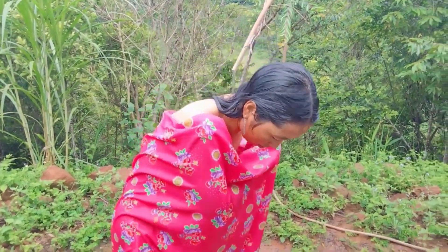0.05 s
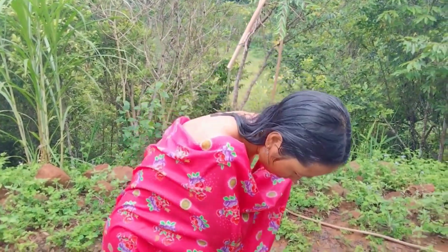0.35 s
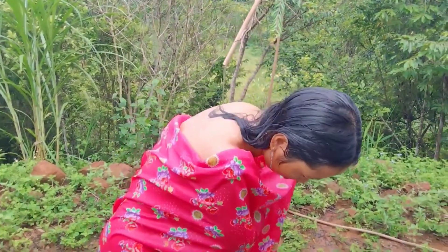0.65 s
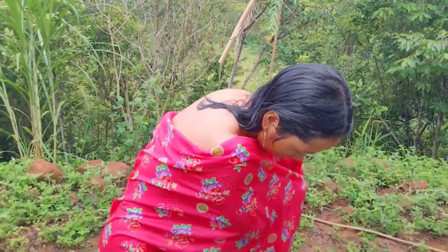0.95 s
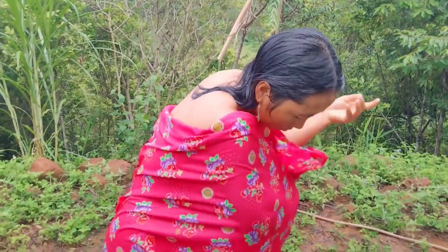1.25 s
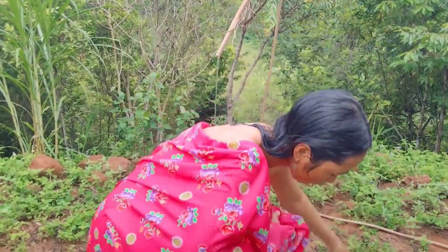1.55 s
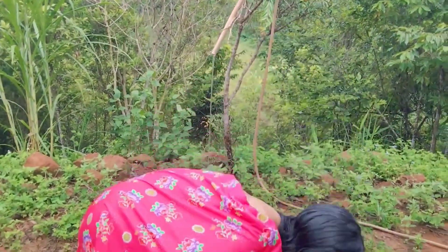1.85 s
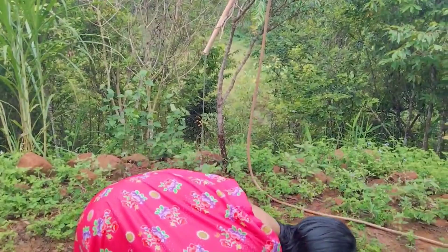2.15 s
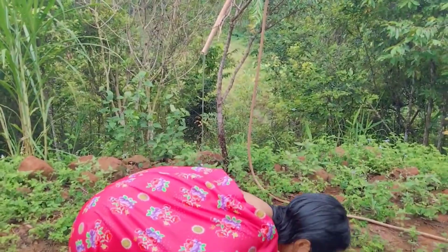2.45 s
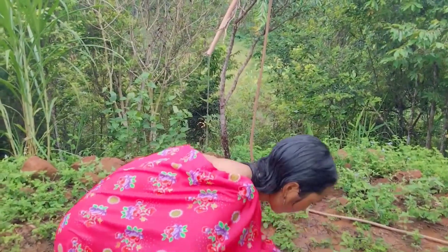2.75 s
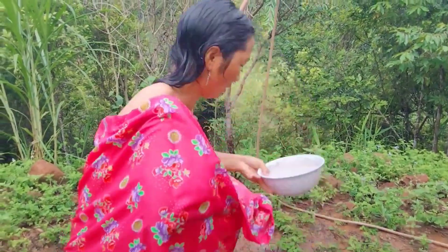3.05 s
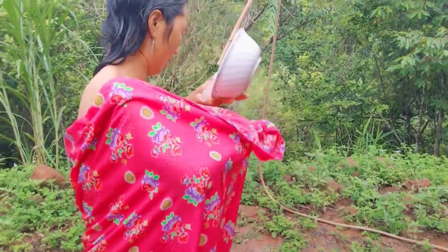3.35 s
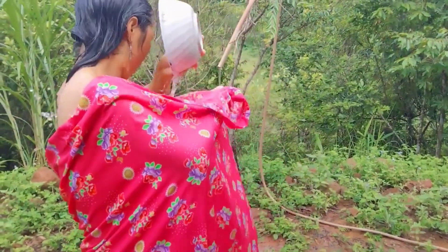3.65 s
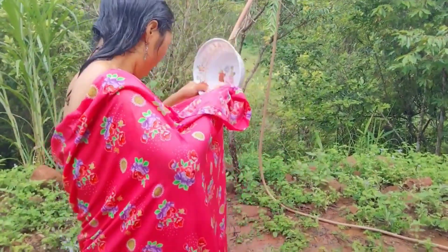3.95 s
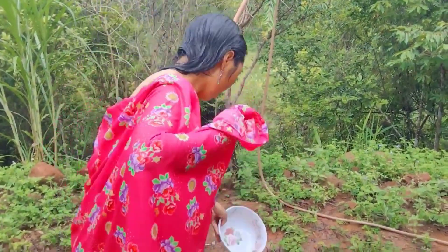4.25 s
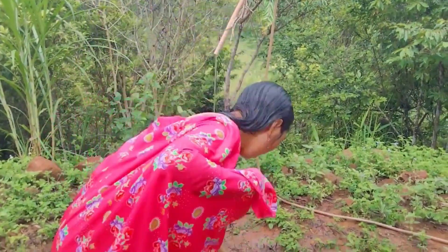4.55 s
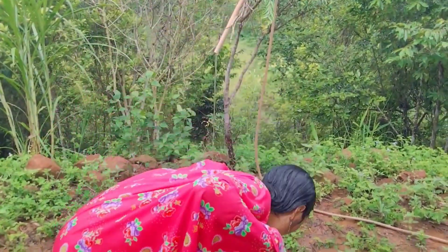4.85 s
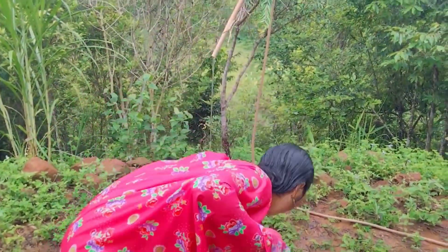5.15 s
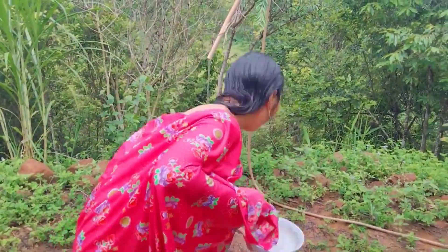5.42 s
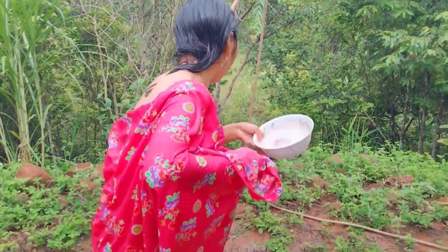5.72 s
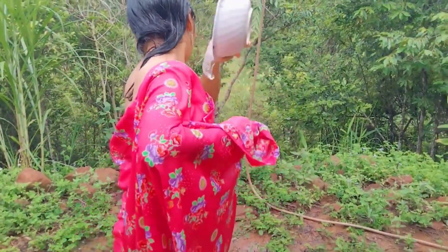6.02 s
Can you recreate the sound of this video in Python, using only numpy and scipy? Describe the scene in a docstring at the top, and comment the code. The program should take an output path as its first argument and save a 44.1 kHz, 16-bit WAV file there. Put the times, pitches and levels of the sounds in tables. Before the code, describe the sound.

Someone bathes in a garden: soft drips, a bowl gurgling as it fills, and two louder splashing pours.

```python
"""A bath in a garden with a plastic bowl. Over faint open air, wet cloth drips and water swishes on it.
From 1.7 s the bowl is dipped and gulps full: large bubbles ring and glide upward, and the bowl gives one
long hollow ring. At 3.5 s it is emptied over the body; water slaps and patters on the ground as clouds of
tiny bubbles and noise. From 4.5 s the bowl is filled again, and just before the end it is tipped once more.
Throughout, the right microphone port rings in the treble."""
import sys
import numpy as np
from scipy import signal
from scipy.fft import rfft, irfft, next_fast_len
from scipy.io import wavfile
from scipy.ndimage import map_coordinates

SR = 44100
rng = np.random.default_rng(int(sys.argv[2]) if len(sys.argv) > 2 else 0)


def log_audio(samples):
    """Write samples as a 16-bit WAV file to the path given in sys.argv[1]."""
    # one column per channel
    frames = np.atleast_2d(samples).T
    # limit to full scale, then quantise
    limited = np.clip(frames, -1, 1)
    pcm = np.round(limited * 32767).astype(np.int16)
    wavfile.write(sys.argv[1], SR, pcm)


N = 272538

# open air: time_s, level_db, left_minus_right_db
AIR_LEVELS = [(0.0, -59, -7.5), (1.2, -58.5, -10), (2.1, -57, -4), (2.9, -55.5, -5.5), (3.7, -56, -1.5),
              (5.1, -55, -3), (5.7, -55.5, -5.5), (6.18, -54, -4)]
# rumble of air and water: freq_hz, gain_db
RUMBLE_SPECTRUM = [(20, -19), (35, -7), (65, -15.5), (100, -2.5), (135, -2.5), (200, -2), (350, -4.5),
                   (600, -5.5), (1100, -14.5), (2000, -21), (6000, -32), (10000, -25.5)]
# its left-right likeness: freq_hz, correlation
RUMBLE_CORRELATION = [(30, 0.37), (100, 1), (500, 0.46), (2000, 0.043)]
# where the water lands: time_s, left_minus_right_db
WATER_PAN = [(0.0, -4), (0.6, -2), (2.1, -1.5), (3.2, -1.5), (3.4, 2), (3.85, 5), (3.98, -1), (5.15, 0.5),
             (5.5, -1.5)]
# fine, medium and coarse water: freq_hz, gain_db
SPRAY_SPECTRUM = [(200, -68), (2000, -18.5), (4500, -5.5), (6500, -5.5), (9000, -2), (11500, -1),
                  (13500, 0), (15500, 2)]
PATTER_SPECTRUM = [(100, -60), (800, -22), (1800, -7.5), (2700, -1), (4000, -2), (6000, -7.5),
                   (9000, -21.5), (15000, -5)]
SLOSH_SPECTRUM = [(40, -55), (150, -38), (300, -3), (430, -4), (600, 1), (850, 2), (1350, -0.5),
                  (2000, -2.5), (3200, -10.5), (7000, -22)]
# dripping cloth: spray_db, patter_db, slosh_db
CLOTH_TRICKLE_DB = [-63, -76.5, -70]
# loose masses landing: start_s, spray_db, patter_db, slosh_db, rise_s, t60_s
WATER_SLAPS = [(0.078, -47, -53.5, -70, .002, 0.11), (0.361, -48.5, -58, -77, .002, 0.092),
               (0.672, -42.5, -49, -54, 0.00091, 0.56), (0.706, -38, -43, -45, 0.0027, 0.09),
               (0.861, -41, -54.5, -59.5, 0.0024, 0.35), (1.338, -44, -64, -65, .008, 0.44),
               (1.736, -43.5, -49.5, -55, .002, 0.24), (1.957, -61, -55, -33.5, .001, 0.36),
               (2.324, -42, -44.5, -48, 0.0035, 0.37), (2.5, -50, -51.5, -53, .002, 0.23),
               (3.81, -41, -35, -46, 0.0017, 0.1), (3.833, -29, -54, -40, 0.0027, 0.073),
               (3.886, -48, -41.5, -62, 0.0017, 0.12), (4.072, -51, -41.5, -63, .002, 0.23),
               (4.104, -42, -34, -30, .002, 0.19), (4.12, -23, -33, -31.5, 0.019, 0.065),
               (4.447, -40.5, -41.5, -46, .002, 0.2), (4.518, -45, -43, -31.5, .007, 0.024),
               (4.576, -56, -47, -45.5, .003, 0.24), (4.761, -54, -64, -42, 0.0035, 0.28),
               (4.965, -47, -42, -56, 0.0032, 0.22), (5.274, -38, -42, -38.5, 0.0018, 0.18),
               (6.14, -36.5, -50, -63, 0.0025, .25)]
# single drops close by: start_s, relative_db
NEAR_DROPS = [(0.0818, -26), (0.2089, -33.5), (0.4286, -32), (1.3184, -30.5), (1.42, -35), (1.7, -21.5),
              (1.73, -26), (1.8265, -21), (1.922, -23.5), (2.0793, -24), (2.5004, -26), (2.5247, -34),
              (2.739, -26.5), (2.7945, -27), (2.87, -31), (2.8938, -26.5), (2.9396, -28), (3.04, -27.5),
              (3.0672, -24.5), (3.444, -12), (3.458, -10), (3.587, -14), (3.6018, -7.5), (3.6958, -9.5),
              (3.955, -20), (3.9809, -16.5), (4.198, -23), (4.214, -14.5), (4.2989, -12.5), (4.362, -20),
              (4.4194, -15), (4.5227, -20), (4.559, -22), (4.5748, -17), (4.6547, -13), (4.803, -15.5),
              (4.8771, -12), (4.9648, -14.5), (5.0775, -20), (5.1061, -15), (5.1833, -17), (5.2638, -18),
              (5.3522, -29), (5.4475, -29), (5.5295, -25), (5.5762, -20.5), (5.7169, -26), (5.987, -20.5)]
# their colour: freq_hz, gain_db
DROP_SPECTRUM = [(80, -45), (500, -31), (2500, -23), (4500, -10), (7000, -9.5), (9500, -5.5), (14000, -3.5)]
# water over cloth: peak_s, spray_db, slosh_db, width_s
CLOTH_SWISHES = [(0.104, -55.5, -67, 0.12), (0.433, -55.5, -79, 0.066), (0.588, -49.5, -56.5, 0.11),
                 (1.245, -56, -67, 0.11), (1.45, -58, -72, 0.094), (1.695, -53.5, -64, 0.12),
                 (2.46, -55, -63, 0.12), (2.742, -49, -54, 0.078), (2.923, -53, -64, 0.11),
                 (3.08, -51.5, -61.5, 0.1), (3.234, -44.5, -50, 0.11), (3.42, -39.5, -51.5, 0.16),
                 (4.02, -41.5, -80, 0.041), (5.497, -47, -64, .045), (5.835, -47, -56.5, 0.068),
                 (5.92, -43.5, -50, 0.078), (6.075, -47.5, -62.5, 0.18)]
# air bubbles, and one long hollow ring of the bowl (at 2.445 s):
# start_s, pitch_hz, relative_db, glide_oct_per_s, t60_s
BUBBLE_AND_BOWL_RINGS = [(0.155, 1330, -51.5, 5, .035), (0.223, 1110, -50, 4, 0.029),
                         (0.362, 4300, -45, 3, .018), (0.706, 1390, -35, 4.5, 0.021),
                         (1.385, 336, -47.5, 1, .12), (1.687, 1240, -32.5, 140, 0.033),
                         (1.738, 2710, -37, 5, 0.02), (1.823, 1100, -39, 6.8, .05),
                         (1.845, 1410, -41, 12, .07), (1.858, 2040, -42, 4, .05),
                         (2.016, 1210, -28, 2, 0.04), (2.039, 1062, -27, 0.82, 0.053),
                         (2.198, 960, -50, 16, .16), (2.27, 925, -38.5, 18, .14), (2.33, 2800, -35, 5, .03),
                         (2.346, 659, -32, 0.46, .1), (2.371, 626, -40.5, 1.4, 0.19),
                         (2.445, 623, -51, 0.64, .5), (2.908, 2950, -46, 3, .025),
                         (3.461, 2650, -22, 2, .02), (3.5, 513, -35, 2, 0.1), (3.525, 770, -36, 2, .054),
                         (4.135, 1350, -22.5, 2, 0.033), (4.466, 513, -35.5, 1.7, .085),
                         (4.516, 1890, -29, 1.4, 0.02), (4.522, 525, -27, 2.9, 0.12),
                         (4.59, 1530, -39.5, 2.5, .034), (4.605, 1180, -36.5, 10, 0.034),
                         (4.805, 970, -33.5, 10.7, 0.073), (4.846, 1056, -33, 5, 0.057),
                         (4.898, 660, -33.5, 2, 0.052), (5.105, 411, -32, .8, 0.071),
                         (5.147, 596, -37, 1.3, 0.11), (5.165, 786, -40, 4.1, .09),
                         (5.326, 1532, -44, 3, .11), (5.89, 1900, -43, 4, .04)]
# bowl scooping: peak_s, spray_db, patter_db, slosh_db, width_s
BOWL_STROKES = [(1.848, -51, -52.5, -46, 0.055), (1.953, -45.5, -52, -51, 0.028),
                (2.084, -48, -56, -44, .085), (2.255, -51, -57.5, -54, 0.082),
                (4.67, -44, -51.5, -51, 0.084), (4.873, -40.5, -42.5, -43, .1),
                (5.002, -42.5, -51, -52, .06), (5.073, -42, -43.5, -40, 0.062),
                (5.17, -42.5, -46.5, -41.5, 0.048), (5.23, -58, -66, -48, .045),
                (5.346, -47, -47.5, -56.5, 0.081)]
# first mass of a bowlful landing: start_s, spray_db, patter_db, slosh_db
BOWL_POURS = [(3.457, -22.5, -26, -37), (6.159, -23, -31.5, -40.5)]
# flow after the landing: spray, patter, slosh
GUSH_DB, GUSH_SAG_DB_PER_S = [-29, -40, -32.5], [11.5, 13, 48.5]
CLOTH_RUNOFF_DB = [-38, -55, -54]
# microphone ports: freq_hz, gain_db
LEFT_PORT_RESPONSE = [(500, -1.5), (3000, 1), (6000, -3.5), (9000, -4.5), (11000, -2.5), (13300, 1),
                      (15500, -2)]
RIGHT_PORT_RESPONSE = [(500, -3.5), (3000, 2.5), (6000, 4.5), (7600, 8.5), (9100, 16), (10600, 7.5),
                       (12500, 4), (14000, 5), (15300, 5)]


def amp(db):
    """Decibels to gain."""
    return 10 ** (np.asarray(db) / 20)


def unit(x):
    """Scale to rms 1."""
    return x / np.sqrt(np.mean(x ** 2) + 1e-20)


def along(points, hz):
    """Read (freq_hz, value) points on a log axis."""
    freq_hz, values = np.transpose(points)
    return np.interp(np.log(hz + 1), np.log(freq_hz + 1), values)


def curves(rows):
    """One value per sample for each column after time_s."""
    time_s, *columns = np.transpose(rows)
    return [np.interp(np.arange(N) / SR, time_s, column) for column in columns]


def wobble(rate_hz):
    """Smooth random curve with knots at rate_hz."""
    knots = rng.standard_normal(int(N * rate_hz / SR) + 4)
    return map_coordinates(knots, [np.arange(N) * rate_hz / SR])


def filtered(x, response):
    """Apply the gain response(hz)."""
    size = next_fast_len(N + 8192)
    return irfft(rfft(x, size) * response(np.fft.rfftfreq(size, 1 / SR)), size)[..., :N]


def panned(x, lean_db):
    """Lean left by lean_db."""
    return x * amp(np.array([[1], [-1]]) * lean_db / 2)


def add(track, start_s, sound):
    """Mix a sound into a track."""
    part = track[..., max(0, round(start_s * SR)):][..., :sound.shape[-1]]
    part += sound[..., :part.shape[-1]]


def swell(t, rise_s, t60_s):
    """Linear rise, exponential decay."""
    return np.minimum(t / rise_s, 1) * amp(-60 * np.maximum(t - rise_s, 0) / t60_s)


def surges(rows):
    """Spray, patter and slosh power of smooth rises and falls."""
    power, t = np.zeros((3, N)), np.arange(N) / SR
    for peak_s, *levels_db, width_s in rows:
        near_s = t[abs(t - peak_s) < .5]
        hump = 1 / np.cosh(np.clip(2 * (near_s - peak_s) / width_s, -20, 20))
        add(power, near_s[0], np.outer(amp(levels_db), hump) ** 2)
    return power


def rumble():
    """Low stereo noise, most alike on both sides near 100 Hz."""
    def mid_side_gains(hz):
        angle = np.arccos(np.clip(along(RUMBLE_CORRELATION, hz), -1, 1)) / 2
        return amp(along(RUMBLE_SPECTRUM, hz)) * [np.cos(angle), np.sin(angle)]
    mid, side = filtered(rng.standard_normal((2, N)), mid_side_gains)
    return unit(np.array([mid + side, mid - side]))


def air():
    """Low, even rush of open air."""
    level_db, lean_db = curves(AIR_LEVELS)
    return panned(amp(level_db) * rumble(), lean_db)


def trickle(unrest_db=.4):
    """Flow power of the wet cloth, which never stops dripping."""
    return np.outer(amp(CLOTH_TRICKLE_DB), amp(unrest_db * wobble(rate_hz=20))) ** 2


def bubble_cloud(count, low_hz, high_hz, decay_cycles, spread_db, port_lag_s, samples):
    """Tiny bubbles: damped sines rising in pitch, each from its own direction."""
    when, pitch, strength, bearing = rng.random((count, 4)).T[:, :, None]
    hz = low_hz + (high_hz - low_hz) * pitch
    gain = amp(-spread_db * np.log(1 - .97 * strength)) * hz ** .75
    index = (when * N).astype(int) + np.arange(samples)
    ports = []
    for side in (1, -1):
        delay_s = port_lag_s * (1 + side * (2 * bearing - 1)) / 2  # nearer port first
        t = np.maximum(np.arange(samples) / SR - delay_s, 0)
        age = t * hz / decay_cycles
        ring = gain * np.exp(-age) * np.sin(2 * np.pi * hz * t * (1 + .03 * np.minimum(age, 4)))
        ports.append(np.bincount(index.ravel(), ring.ravel(), N + samples)[:N])
    return unit(np.array(ports))


def noise_pair(correlation):
    """White stereo noise with a shared part."""
    angle = np.arccos(correlation) / 2
    mid, side = rng.standard_normal((2, N)) * [[np.cos(angle)], [np.sin(angle)]]
    return np.array([mid + side, mid - side])


def swarms(x, depth_db, knee_hz=500, life_s=.018):
    """Bubbles of like size swarm: brief humps in the spectrum."""
    hz, t, spectrum = signal.stft(x, SR, nperseg=512)
    grid = np.array(np.meshgrid(np.log1p(hz / knee_hz) * 4, t / life_s, indexing="ij"))
    humps = map_coordinates(rng.standard_normal((40, 800)), grid, mode="mirror")
    return signal.istft(spectrum * amp(depth_db * humps), SR, nperseg=512)[1][:, :N]


def water(flow, cloud, spectrum, wash_db, correlation, clump_db, swarm_db, crowding=.068):
    """Bubbles come in clumps and swarms; stronger flow merges them into a wash."""
    tint = lambda hz: amp(along(spectrum, hz))
    bubbles = unit(filtered(cloud, tint))
    wash = unit(filtered(noise_pair(correlation), tint))
    wash_gain = amp(wash_db) * unit(flow) ** crowding
    mix = (bubbles + wash_gain * wash) / np.hypot(1, wash_gain)
    return flow * unit(swarms(mix, swarm_db) * amp(clump_db * wobble(rate_hz=130)))


def splashing(spray, patter, slosh):
    """Three sizes of drops and bubbles follow the flow."""
    fine = bubble_cloud(5000, 3850, 14200, decay_cycles=3, spread_db=.5, port_lag_s=.00016, samples=64)
    medium = bubble_cloud(3000, 1687, 7310, decay_cycles=5.6, spread_db=2.5, port_lag_s=.00018,
                          samples=256)
    coarse = bubble_cloud(2000, 325, 2597, decay_cycles=3.16, spread_db=2.5, port_lag_s=.00037,
                          samples=800)
    return (water(spray, fine, SPRAY_SPECTRUM, wash_db=2.5, correlation=.15, clump_db=1.13,
                  swarm_db=2.07)
            + water(patter, medium, PATTER_SPECTRUM, wash_db=2, correlation=.44, clump_db=1.63,
                    swarm_db=3)
            + water(slosh, coarse, SLOSH_SPECTRUM, wash_db=4.5, correlation=.7, clump_db=-.4,
                    swarm_db=3))


def water_weight(slosh, gain_db=-41.5, db_per_slosh_db=.35):
    """Low rumble of moving water, growing with the slosh."""
    return amp(gain_db) * slosh ** db_per_slosh_db * rumble()


def scatter(x, gain_db=-13):
    """Wet ground and the body return a very short echo to each side."""
    t = np.arange(SR // 10) / SR
    tail = rng.standard_normal((2, len(t))) * swell(t, rise_s=.002, t60_s=.06)
    return amp(gain_db) * signal.fftconvolve(x, tail / np.linalg.norm(tail[0]), axes=1)[:, :N]


def slaps():
    """Flow power of loose masses of water slapping down."""
    power, t = np.zeros((3, N)), np.arange(SR // 2) / SR
    for start_s, *levels_db, rise_s, t60_s in WATER_SLAPS:
        add(power, start_s, np.outer(amp(levels_db), swell(t, rise_s, t60_s)) ** 2)
    return power


def drops(gain_db=-5, ring_db=-5, ring_hz=8800, crack_db=-2, mist_db=-20, rise_s=.00087):
    """A drop cracks, gives a brief high ring and scatters a short mist."""
    track, t = np.zeros((2, N)), np.arange(SR // 10) / SR
    crack = amp(crack_db) * swell(t, rise_s, t60_s=.011)
    mist = amp(mist_db) * swell(t, rise_s, t60_s=.09)
    for start_s, relative_db in NEAR_DROPS:
        hz = ring_hz * 2 ** rng.uniform(-.47, .31)
        ring = amp(ring_db) * np.sin(2 * np.pi * hz * t) * swell(t, rise_s, t60_s=.003)
        hiss = unit(rng.standard_normal(len(t)) + rng.standard_normal((2, len(t))))
        add(track, start_s, amp(relative_db + gain_db) * (ring + (crack + mist) * hiss))
    return filtered(track, lambda hz: amp(along(DROP_SPECTRUM, hz)))


def swishes(patter_offset_db=-5):
    """Flow power of water sliding over wet cloth."""
    return surges((peak_s, spray_db, (spray_db + slosh_db) / 2 + patter_offset_db, slosh_db, width_s)
                  for peak_s, spray_db, slosh_db, width_s in CLOTH_SWISHES)


def gulps_and_bowl_ring(gain_db=1, attack_s=.00068, max_glide_oct=.6):
    """Wavering, rising tones: large bubbles nearing the surface, and one hollow ring of the bowl."""
    track, t = np.zeros(N), np.arange(SR // 4) / SR
    waver = 1 + .018 * wobble(rate_hz=180)
    for start_s, pitch_hz, relative_db, glide_oct_per_s, t60_s in BUBBLE_AND_BOWL_RINGS:
        glide_oct = np.minimum(glide_oct_per_s * t, max_glide_oct)
        hz = pitch_hz * 2 ** glide_oct * waver[round(start_s * SR):][:len(t)]
        ring = np.sin(2 * np.pi * np.cumsum(hz) / SR) * (1 - np.exp(-t / attack_s))
        add(track, start_s, amp(relative_db + gain_db - 60 * t / t60_s) * ring)
    return track * (1 + .3 * wobble(rate_hz=350))


def scoops():
    """Flow power of the bowl churning the water."""
    return surges(BOWL_STROKES)


def pours(gush_rise_s=.056, gush_hold_s=.33, gush_t60_s=.5, runoff_sag_db_per_s=8):
    """Flow power as a bowlful lands, gushes and drains from the cloth."""
    power = np.zeros((3, N))
    for start_s, *levels_db in BOWL_POURS:
        t = np.arange(N - round(start_s * SR)) / SR
        landing = np.outer(amp(levels_db), swell(t, rise_s=.001, t60_s=.24))
        onset = np.minimum(t / gush_rise_s, 1)
        emptied_db = 60 * np.maximum(t - gush_hold_s, 0) / gush_t60_s
        gush = onset * amp(GUSH_DB)[:, None] * amp(-np.outer(GUSH_SAG_DB_PER_S, t) - emptied_db)
        runoff = onset * np.outer(amp(CLOTH_RUNOFF_DB), amp(-runoff_sag_db_per_s * t))
        add(power, start_s, landing ** 2 + gush ** 2 + runoff ** 2)
    return power


def scene():
    """Flows add in power and drive the splashing; drops, ringing tones, scatter and air join it."""
    spray, patter, slosh = np.sqrt(trickle() + slaps() + swishes() + scoops() + pours())
    weight = water_weight(slosh)
    lean_db, = curves(WATER_PAN)
    bath = panned(splashing(spray, patter, slosh) + drops() + gulps_and_bowl_ring() + weight, lean_db)
    return bath + scatter(bath) + air()


def record(dry, cutoff_hz=15650, edge_hz=200):
    """Each microphone port colours its side; a steep low-pass limits the band."""
    ports = filtered(dry, lambda hz: amp([along(LEFT_PORT_RESPONSE, hz), along(RIGHT_PORT_RESPONSE, hz)]))
    return filtered(ports, lambda hz: np.clip((cutoff_hz - hz) / edge_hz + .5, 0, 1))


dry = scene()
out = record(dry)
log_audio(out)
```